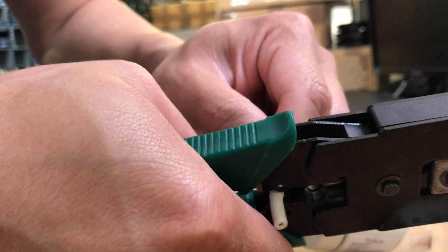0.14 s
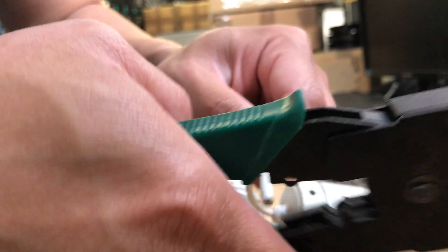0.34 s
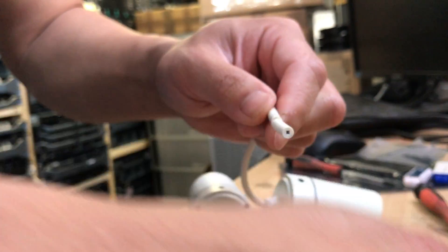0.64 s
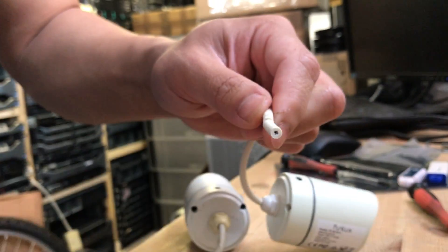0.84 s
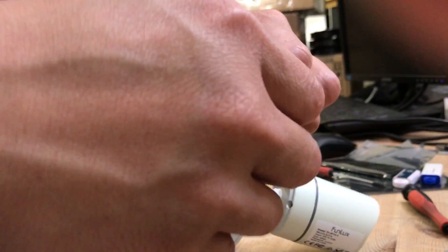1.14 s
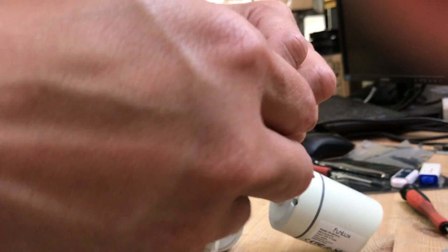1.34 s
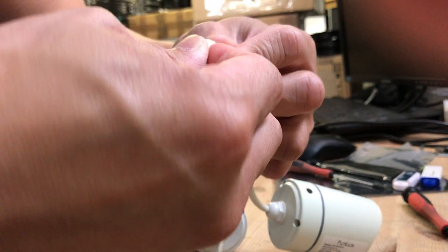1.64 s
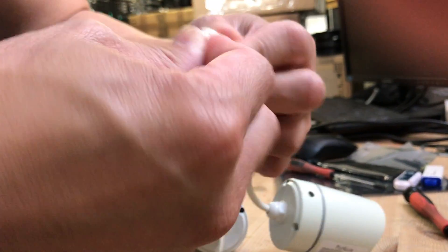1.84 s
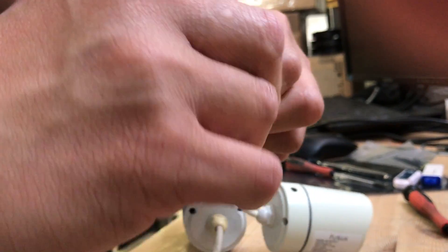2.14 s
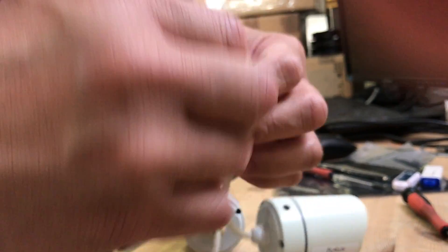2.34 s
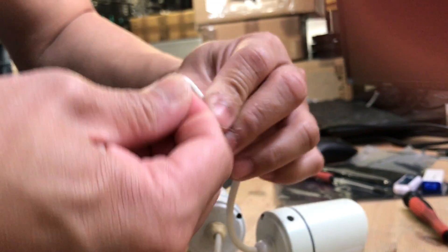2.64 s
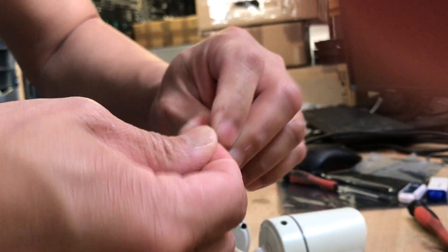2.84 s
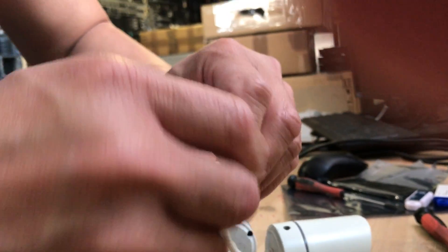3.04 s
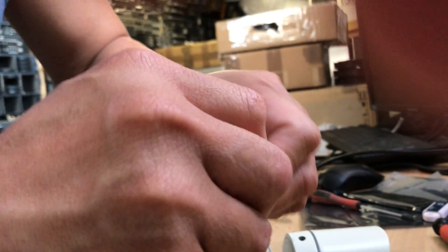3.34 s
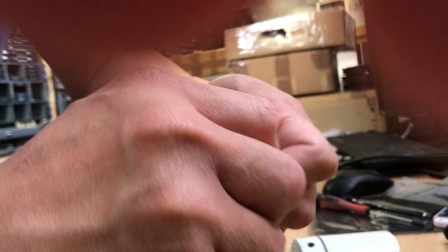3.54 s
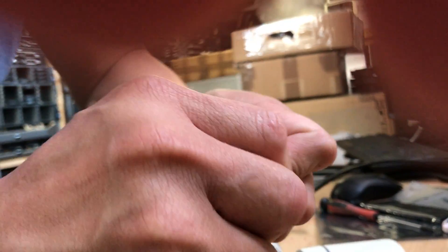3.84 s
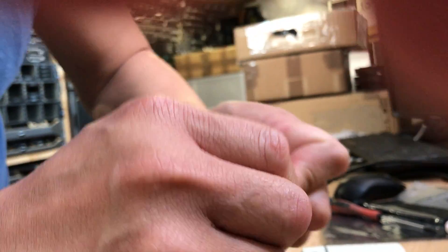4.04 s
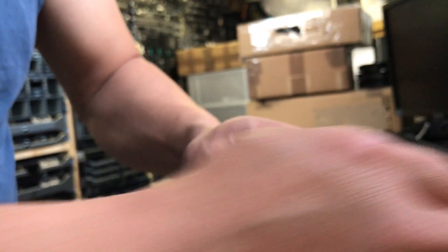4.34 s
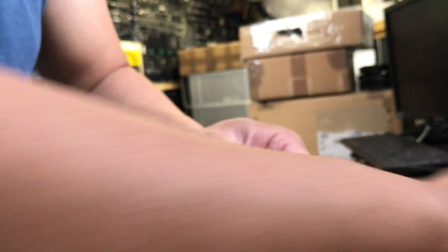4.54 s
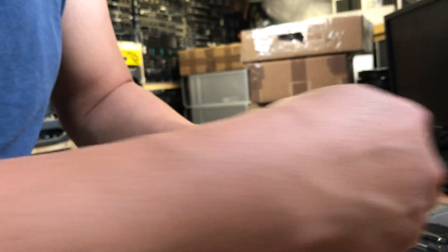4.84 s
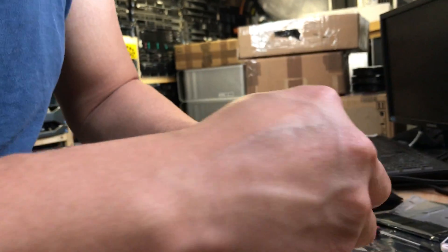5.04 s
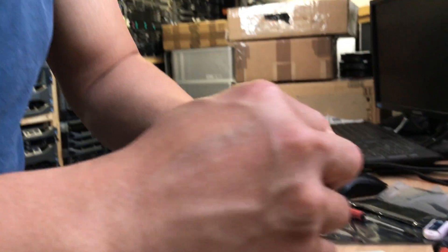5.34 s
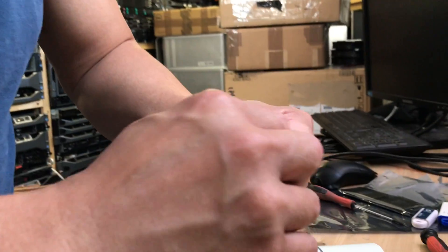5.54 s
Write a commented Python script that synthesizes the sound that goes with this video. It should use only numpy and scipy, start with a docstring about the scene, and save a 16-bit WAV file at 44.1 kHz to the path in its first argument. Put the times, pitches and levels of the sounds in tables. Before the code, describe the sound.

A steel crimping tool clacks down on a wooden bench, then a small hollow housing knocks amid light clicks and fan hum.

```python
"""Fan noise and hum fill a small, cluttered workshop, heard on one microphone close to the wooden bench.
A steel crimping tool with plastic grips is laid down: it lands, tips over and clacks flat, each clack
a run of contacts that ring its plates, links and grips and thump the bench. Then fingers work on a
cable with light snaps and ticks, and the small hollow housing at its end knocks and rocks on the
bench. Nearby surfaces return dull echoes, and a low background rumble swells now and then."""
import sys
import numpy as np
from scipy import signal
from scipy.fft import rfft, irfft, next_fast_len
from scipy.io import wavfile

SR = 44100
rng = np.random.default_rng(int(sys.argv[2]) if len(sys.argv) > 2 else 0)


def master(y):
    """Save y as 16-bit WAV."""
    cut = np.clip(np.atleast_2d(y).T, -1, 1)
    pcm = np.round(cut * 32767)  # scale
    wavfile.write(sys.argv[1], SR, pcm.astype(np.int16))


N = 250311

# Spectra. Each row: frequency in Hz, relative noise density in dB.
FAN_SPECTRUM = [(20, -25.5), (52, 5.5), (80, -7.5), (140, -14), (500, -15), (900, -16.5), (2000, -21),
                (3400, -26.5), (4500, -31), (6300, -33), (7600, -38), (10500, -41), (11700, -38.5),
                (16000, -37.5)]  # fans and low rumble all around the microphone
RUMBLE_SPECTRUM = [(25, -14), (60, 5.5), (150, -12), (350, -10), (800, -20.5), (4000, -28), (16000, -67)]  # low background rumble that swells
HISS_SPECTRUM = [(500, 10), (2000, 7.5), (6000, 3), (10000, -0.5), (16000, -0.5)]  # thin hiss while the tool is put down
TICK_SPECTRUM = [(300, 25), (2000, -0.5), (4500, -1), (6500, -7), (9000, -3.5), (12000, -15), (16000, -16)]  # clicks of handling
WALL_SPECTRUM = [(120, -10), (350, 15), (1000, 7.5), (1400, 6), (2000, 2.5), (2900, -18), (4400, -4),
                 (6000, -20), (8000, -1.5), (15000, -45)]  # clatter of the housing's thin wall
LINK_SPECTRUM = [(100, -18), (300, -3), (900, -3.5), (1600, -5.5), (2300, -8), (3200, -11), (4800, -10.5),
                 (6300, -2), (7800, -22.5), (11500, -11.5), (16000, -5.5)]  # rattle of the tool's loose links
# Resonances in the fan noise. Each row: centre in Hz, width in Hz, level in dB.
FAN_RESONANCES = [(105, 6.7, -71.5), (335.4, 22.5, -71), (954, 83, -74), (1180, 46, -72.5),
                  (3480, 340, -77.5)]
# Mains hum and fan whine. Each row: pitch in Hz, level in dB.
HUM_TONES = [(50, -71), (329, -75.5), (381, -77.5), (603, -74.5), (985, -78.5), (1464, -83.5),
             (2135, -86.5), (2490, -87.5), (3456, -81.5), (3682, -86), (3960, -88), (4190, -88.5),
             (6000, -95), (6160, -92.5)]
# Echoes off surfaces near the microphone. Each row: delay in seconds, gain in dB before dulling.
NEAR_ECHOES = [(.0034, -26), (.0062, -13.5), (0.0122, -16), (0.0143, -15)]
# Decay of the workshop. Each row: frequency in Hz, t60 in seconds.
ROOM_DECAY = [(100, 0.35), (300, 0.18), (1000, 0.14), (4000, 0.21), (12000, 0.064)]
# Modes of the struck parts. Each row: frequency in Hz, relative level in dB, t60 in seconds.
BENCH_MODES = [(138.4, -12, 0.17), (171.8, -7.5, 0.066), (189, 2.5, 0.1), (230, -6.5, 0.13),
               (341.7, -5, 0.068)]  # wooden bench top
PLASTIC_MODES = [(1080, -2.5, 0.019), (2310, 17, 0.0084), (2506, 13.5, 0.012), (2800, 5, 0.013),
                 (3750, -5, 0.026), (5970, 8, 0.0045)]  # small parts between the fingers
HOUSING_MODES = [(205, -16, .14), (315, -8, .08), (353, -4, .09), (457, -6, .08), (595, -3, .07),
                 (684, -12, .04), (878, -9, .06), (987, -4, .08), (1075, -5, .07), (1440, -19, .08),
                 (1700, -14, .07), (1832, -13, .07), (2020, -17, .07), (2128, -19, .07), (4400, 6, .008)]  # hollow shell at the end of the cable
GRIP_MODES = [(485, 2.5, 0.035), (596, 5.5, 0.0365), (713, 8, 0.051), (1054, -21, 0.0063)]  # the tool's hollow grips
STEEL_MODES = [(328, 5.5, 0.063), (620, -6, 0.098), (909, -10, 0.2), (1061, -8.5, 0.21), (1133, -15, 0.036),
               (1141, -6.5, 0.066), (1206, -4, 0.14), (1354, -13, 0.17), (1686, 0.5, 0.055),
               (1666, -14, 0.071), (1834, -31, 0.053), (1920, -4, 0.074), (2290, -11.5, 0.07),
               (2500, -9, 0.078), (3290, -11.5, .08), (4015, -18.5, 0.17), (4850, -23.5, 0.085),
               (6000, -14, .04)]  # its plates, before the hand damps them
# Slow swells of background rumble. Each row: middle in seconds, length in seconds, peak level in dB.
RUMBLE_SWELLS = [(2.696, .4, -61.5), (3.25, 0.16, -62), (3.848, 0.52, -63), (5.344, 0.92, -63.5)]
# Snaps of plastic. Each row: start in seconds, strength in dB.
PLASTIC_SNAPS = [(1.4617, -33), (5.5936, -24)]
# Clear ticks of ratchet, nails and wire. Each row: start in seconds, click strength in dB,
# low cut in Hz, strength of the dull bump in dB.
CLEAR_TICKS = [(0.115, -44, 4000, -75), (0.82, -30.5, 696, -33), (0.8667, -20.5, 3510, -48),
               (0.9173, -27, 6100, -65), (0.9874, -22, 2800, -35), (0.998, -29, 7000, -70),
               (1.097, -25, 6000, -50), (1.1399, -26.5, 3500, -36), (2.476, -44, 7000, -78),
               (2.7136, -43, 5200, -79), (2.8688, -40, 1170, -69.5), (3.244, -46.5, 3000, -45),
               (4.2715, -37, 590, -34), (4.317, -45, 1990, -37), (4.3264, -42.5, 600, -30.5)]
# Knocks of the housing. Each row: start in seconds, strength in dB, contact sharpness in Hz,
# bounce pitch in Hz, bench thump in dB.
HOUSING_KNOCKS = [(2.4941, -8.5, 2800, 577, -30), (2.584, -35, 750, 518, -50),
                  (2.6133, -38, 900, 531, -52.5), (2.8972, -17, 1281, 559, -43),
                  (3.9966, -38, 687, 533, -54), (4.2099, -36, 1300, 591, -52.5),
                  (4.2216, -38.5, 604, 328, -52.5), (4.751, -36, 685, 357, -43.5),
                  (4.959, -36.5, 990, 547, -53.5)]
# Clacks of the tool. Each row: start in seconds, steel strength in dB, first contact's sharpness in Hz,
# grip strength in dB, bench thump in dB, first chatter gap in seconds, loss per contact in dB.
TOOL_CLACKS = [(0.8201, -45, 6960, -47, -61.5, .002, 17), (0.8647, -23.5, 9020, -11.5, -11.5, 0.0035, 7),
               (1.0043, -29, 1006, -26, -27.5, .006, 6), (1.0412, -9.5, 4580, -25, -22, .0014, 3.5),
               (1.0647, -11, 9500, -35, -20, 0.0034, 2.5), (1.0674, -5.5, 2890, -16, -8, .0045, 5.5),
               (1.123, -18.5, 2510, -27, -43, 0.0024, 2), (1.132, -11.5, 3760, -26, -23.5, .002, 11.5)]

RING_TIME = np.arange(16384) / SR  # seconds since a strike


def amp(db):
    """Decibels to gain."""
    return 10 ** (np.asarray(db) / 20)


def unit(x):
    """Scales to an rms of one."""
    return x / np.sqrt(np.mean(x ** 2) + 1e-20)


def read(points, hz):
    """Reads a table on a log-frequency axis."""
    f, value = np.transpose(points)
    return np.interp(np.log(hz + 1), np.log(f + 1), value)


def add(mix, start_s, sound):
    """Mixes a sound in at its start time."""
    part = mix[max(round(start_s * SR), 0):][:len(sound)]
    part += sound[:len(part)]


def noise(spectrum, size):
    """Noise of rms one with the given spectrum."""
    length = next_fast_len(size, True)
    gain = amp(read(spectrum, np.fft.rfftfreq(length, 1 / SR)))
    return unit(irfft(rfft(rng.standard_normal(length)) * gain, length)[:size])


def soften(x, hz):
    """Low-pass: a longer contact passes less treble."""
    return signal.sosfilt(signal.butter(2, np.clip(hz, 30, .45 * SR), fs=SR, output="sos"), x)


def thin(x, hz):
    """High-pass: light, small things radiate little bass."""
    return signal.sosfilt(signal.butter(2, np.clip(hz, 20, .45 * SR), "high", fs=SR, output="sos"), x)


def ring(modes, rise_s, shares=1):
    """Dying modes; the shares say how far, and which way, the struck spot moves in each."""
    hz, db, t60 = np.transpose(modes)
    t = RING_TIME[:, None]
    waves = shares * amp(db) * np.exp(-np.log(1000) * t / t60) * np.sin(2 * np.pi * hz * t)
    return waves.sum(1) / np.linalg.norm(amp(db)) * (1 - np.exp(-RING_TIME / rise_s))


def edge(modes):
    """At the edge of a part, neighbouring modes move in opposite directions."""
    return (-1) ** np.arange(len(modes))


def burst(spectrum, crack_t60, tail_t60, tail_db):
    """Countless overlapping modes: a short crack and a weaker tail."""
    fall = -np.log(1000) * RING_TIME
    envelope = np.exp(fall / crack_t60) + amp(tail_db) * np.exp(fall / tail_t60)
    return noise(spectrum, len(RING_TIME)) * envelope


def arch(middle_s, length_s):
    """One smooth rise and fall, from zero to one and back."""
    return np.cos(np.pi * np.clip((np.arange(N) / SR - middle_s) / length_s, -.5, .5)) ** 2


def fans_and_hum(noise_db=-61.5, waver_hz=2.665):
    """The room tone: fan noise with a few resonances, low rumble and wavering hum."""
    t = np.arange(N) / SR
    out = amp(noise_db) * noise(FAN_SPECTRUM, N)
    for centre, width, db in FAN_RESONANCES:
        resonator = signal.iirpeak(centre, centre / width, SR)
        out += amp(db) * unit(signal.lfilter(*resonator, rng.standard_normal(N)))
    moments = np.arange(0, t[-1] + 1, 1 / 10)
    for pitch, db in HUM_TONES:
        drift = np.interp(t, moments, rng.standard_normal(len(moments)))
        phase = 2 * np.pi * np.cumsum(pitch + waver_hz * drift) / SR
        out += amp(db) * np.sqrt(2) * np.sin(phase)
    return out


def rumble():
    """Slow swells of low background rumble."""
    return sum(amp(db) * arch(s, length) for s, length, db in RUMBLE_SWELLS) * noise(RUMBLE_SPECTRUM, N)


def room(direct, tail_db=-20, echo_hz=3500, build_up_s=0.0051):
    """The direct sound reaches the microphone first, then dull nearby echoes and a short diffuse tail."""
    early = np.zeros(len(RING_TIME))
    for delay, db in NEAR_ECHOES:
        add(early, delay, amp([db]))
    scatter = rng.standard_normal(len(RING_TIME)) * (1 - np.exp(-(RING_TIME / build_up_s) ** 2))
    hz, t, bands = signal.stft(scatter, SR, nperseg=256)
    decay = np.exp(-np.log(1000) * t / read(ROOM_DECAY, hz)[:, None])
    tail = signal.istft(bands * decay, SR)[1][:len(RING_TIME)]
    response = soften(early, echo_hz) + amp(tail_db) * tail / np.linalg.norm(tail)
    return direct + signal.fftconvolve(direct, response)[:N]


def hiss(start_s=0.773, hold_s=.68, fade_s=0.022, db=-66):
    """A thin hiss fades in, holds while the tool is put down, and fades out."""
    corners = start_s + np.cumsum([0, fade_s, hold_s, fade_s])
    envelope = np.interp(np.arange(N) / SR, corners, [0, 1, 1, 0])
    return amp(db) * envelope * noise(HISS_SPECTRUM, N)


def tick(db, low_cut_hz):
    """The ratchet, a nail or a wire end clicks."""
    return amp(db) * thin(burst(TICK_SPECTRUM, crack_t60=0.011, tail_t60=0.048, tail_db=-13), low_cut_hz)


def fidgeting(resting_per_s=2.5, extra_per_s=8, spread_db=2):
    """Shifting fingers tick faintly at random, more often during the swells of rumble."""
    rate = resting_per_s + extra_per_s * sum(arch(s, length) for s, length, _ in RUMBLE_SWELLS)
    touches = (rng.random(N) < rate / SR) * amp(spread_db * rng.standard_normal(N))
    return signal.fftconvolve(touches, tick(db=-53, low_cut_hz=4700))[:N]


def fingers(bump_s=0.0007, bump_lag_s=0.0012):
    """Small plastic parts snap; ratchet, nails and wire tick, some with a dull bump."""
    out = np.zeros(N)
    plastic = ring(PLASTIC_MODES, rise_s=0.00014, shares=edge(PLASTIC_MODES))
    for start, db in PLASTIC_SNAPS:
        crack = amp(-15) * burst(TICK_SPECTRUM, crack_t60=0.0048, tail_t60=0.054, tail_db=-25)
        add(out, start, amp(db) * (plastic + crack))
    u = RING_TIME / bump_s
    bump = soften(np.e * u * (1 - u / 2) * np.exp(-u), hz=900)  # one push and its rebound
    for start, click_db, low_cut_hz, bump_db in CLEAR_TICKS:
        add(out, start, tick(click_db, low_cut_hz))
        add(out, start + bump_lag_s, amp(bump_db) * bump)
    return out


def clatter(db):
    """The thin wall of the housing clatters."""
    return amp(db) * burst(WALL_SPECTRUM, crack_t60=0.0085, tail_t60=0.14, tail_db=-12)


def housing(bounce_t60=0.044, rim_lag_s=.0075, rim_hz=1045, rim_t60=0.047):
    """The housing knocks, bounces at a pitch set by the contact's stiffness, and lands on its rim."""
    out = np.zeros(N)
    shell = amp(-5) * ring(HOUSING_MODES, rise_s=0.0005, shares=edge(HOUSING_MODES))
    rim = amp(-11.5) * ring([(rim_hz, 0, rim_t60)], rise_s=0.00084)
    bench = ring(BENCH_MODES, rise_s=0.0019)
    for start, db, sharp_hz, bounce_hz, bench_db in HOUSING_KNOCKS:
        knock = amp(db) * soften(shell + clatter(db=-8), sharp_hz)
        bounce_db = -12.5 + 0.7 * db  # soft knocks are mostly bounce
        bounce = amp(bounce_db) * ring([(bounce_hz, 0, bounce_t60)], rise_s=0.0012)
        add(out, start, knock + bounce)
        landing = amp(db) * soften(rim + clatter(db=-22.5), sharp_hz)
        add(out, start + rim_lag_s, landing + amp(bench_db) * bench)
    return thin(out, hz=156)


def chatter(first_gap_s, count=5, gap_ratio=1.5):
    """Delays of the contacts in one clack: each gap is longer than the one before."""
    gaps = first_gap_s * gap_ratio ** np.arange(count)
    return np.cumsum(gaps) - gaps


def steel_contact(detune=0.0114, hand_t60_ratio=0.61):
    """Plates ring and links rattle; shifting joints detune the plates, the hand shortens their ring."""
    modes = [(hz * (1 + detune * rng.standard_normal()), db, t60 * hand_t60_ratio)
             for hz, db, t60 in STEEL_MODES]
    directions = rng.choice([-1, 1], len(modes))  # each contact strikes a new spot
    plates = amp(-6) * ring(modes, rise_s=0.00016, shares=directions)
    links = amp(-2) * burst(LINK_SPECTRUM, crack_t60=.013, tail_t60=.075, tail_db=-13)
    return plates + links


def crimping_tool(dulling=0.67, settle_s=0.00746, legs_hz=44, legs_t60=0.47):
    """Each clack is a run of ever weaker, duller contacts; the heavy bench follows once."""
    out, sway = np.zeros((2, N))
    grips = ring(GRIP_MODES, rise_s=0.00032, shares=edge(GRIP_MODES))
    bench = ring(BENCH_MODES, rise_s=0.0018)
    legs = amp(-34) * ring([(legs_hz, 0, legs_t60)], rise_s=0.015)
    for start, steel_db, sharp_hz, grip_db, bench_db, gap_s, loss_db in TOOL_CLACKS:
        for k, delay in enumerate(chatter(gap_s)):
            steel = amp(steel_db) * soften(steel_contact(), sharp_hz * dulling ** k)
            add(out, start + delay, amp(-k * loss_db) * (steel + amp(grip_db) * grips))
        # the tool's weight settles: the top thumps and the bench sways on its legs
        add(out, start + settle_s, amp(bench_db) * bench)
        add(sway, start + settle_s, amp(bench_db) * legs)
    return thin(out, hz=99) + sway


def scene():
    """The work on the bench, close up and in mono, over the room tone of the workshop."""
    bench_work = crimping_tool() + housing() + fingers() + fidgeting()
    return (room(bench_work) + fans_and_hum() + rumble() + hiss())[None]


def record(dry):
    """The recorder behind the microphone cuts the treble above 16 kHz."""
    low_pass = signal.firwin(511, 16000, window=("kaiser", 9), fs=SR)
    return signal.oaconvolve(dry, low_pass[None], "same")


dry = scene()
out = record(dry)
master(out)
```